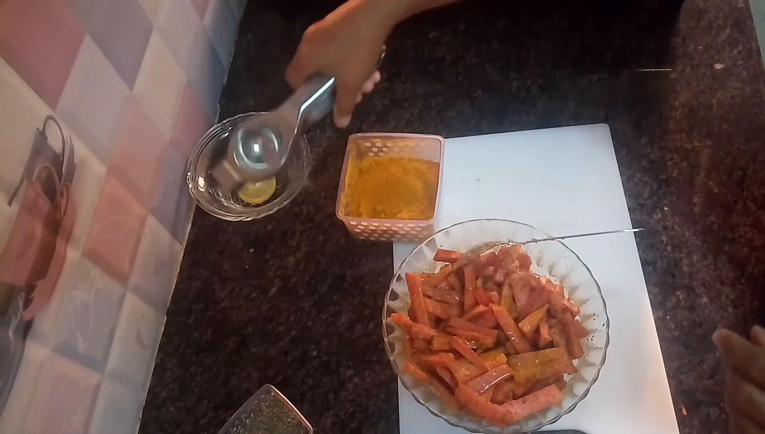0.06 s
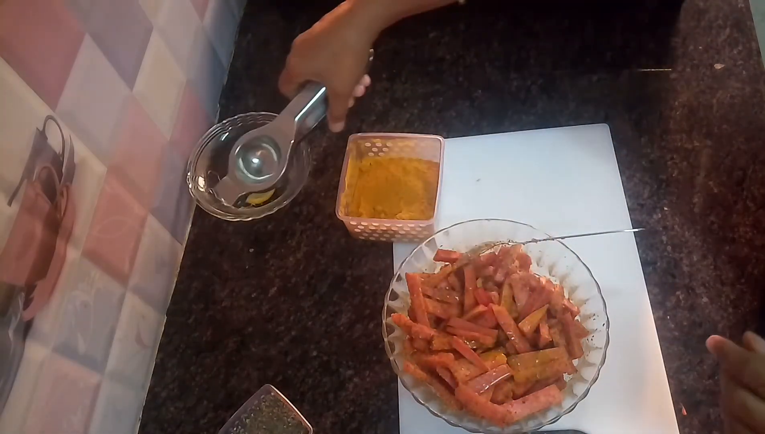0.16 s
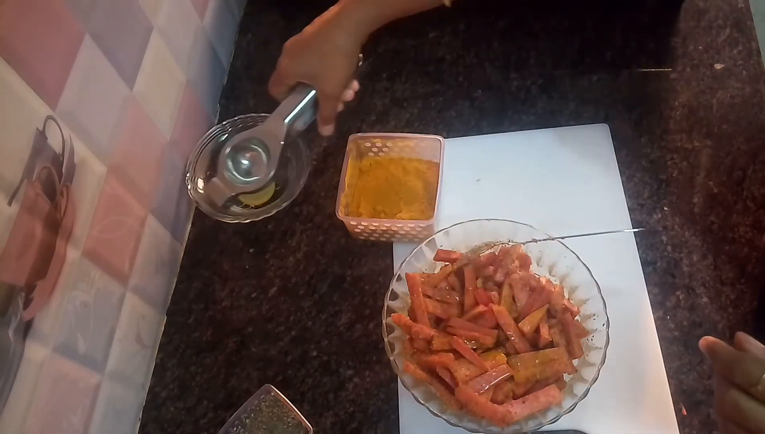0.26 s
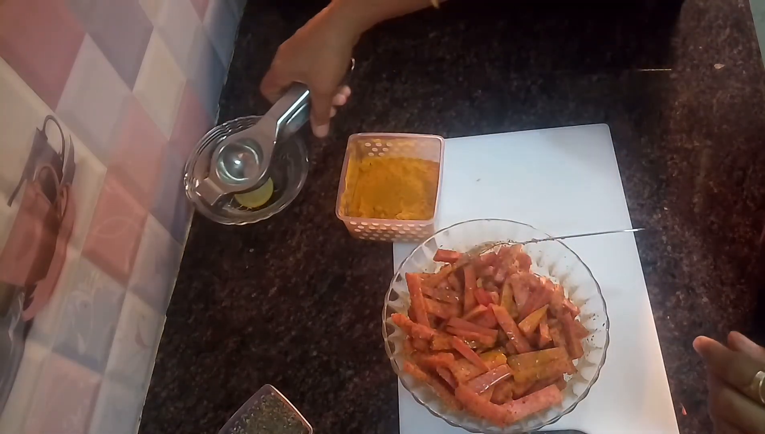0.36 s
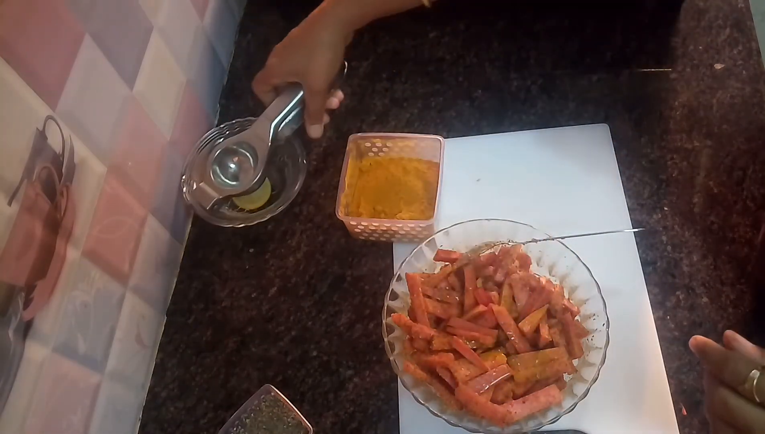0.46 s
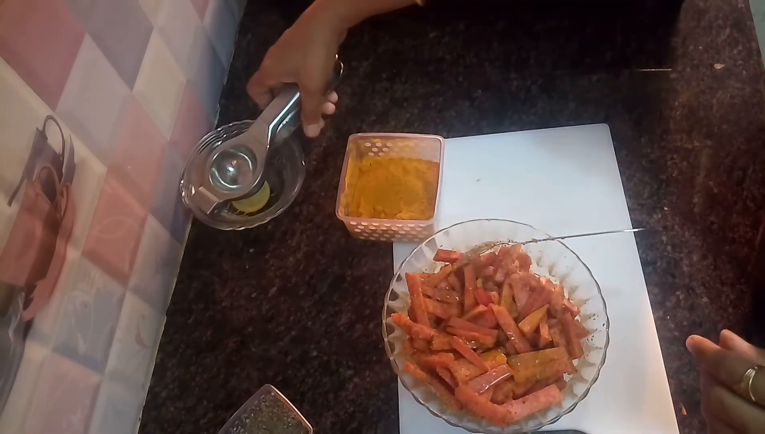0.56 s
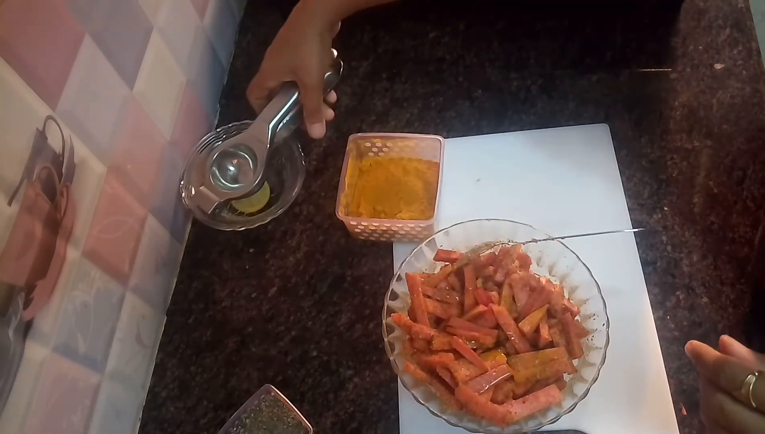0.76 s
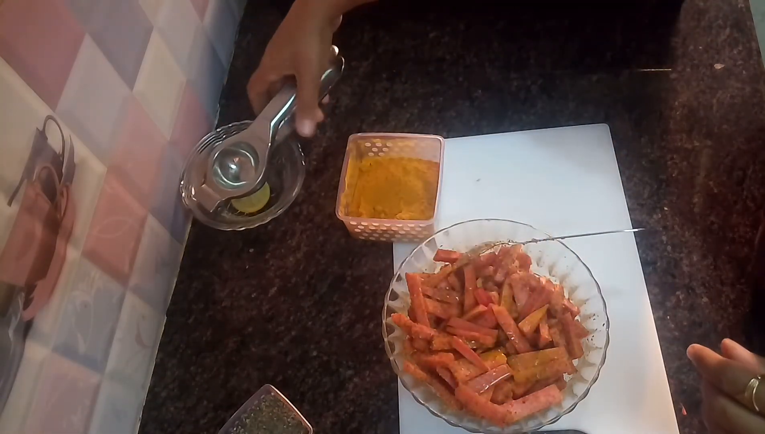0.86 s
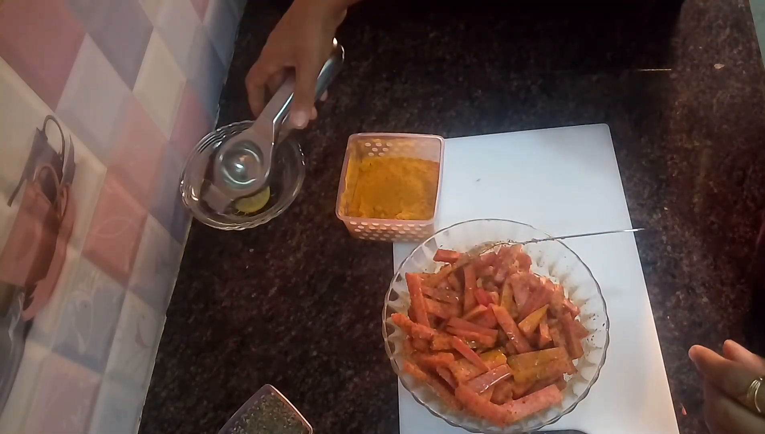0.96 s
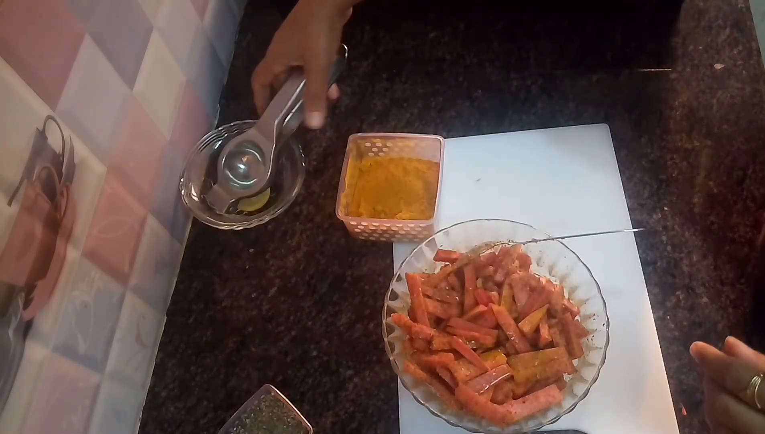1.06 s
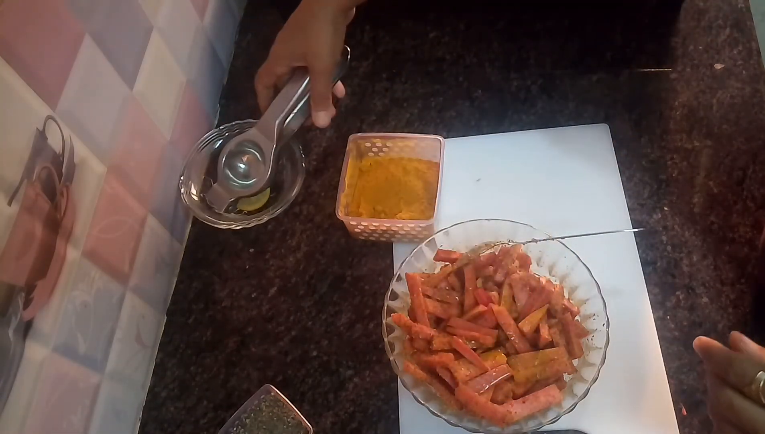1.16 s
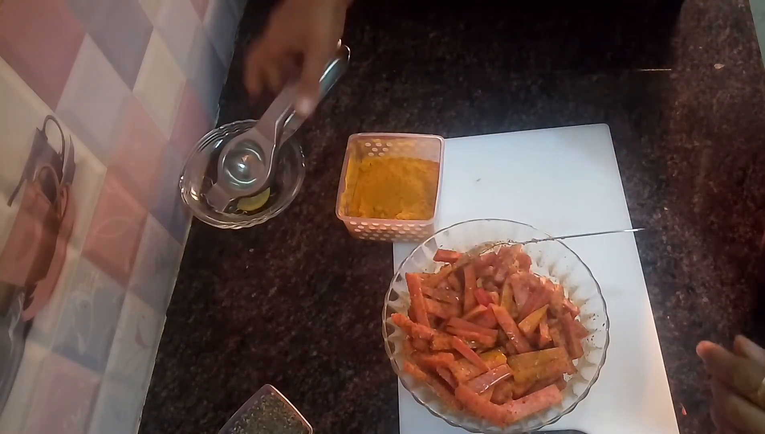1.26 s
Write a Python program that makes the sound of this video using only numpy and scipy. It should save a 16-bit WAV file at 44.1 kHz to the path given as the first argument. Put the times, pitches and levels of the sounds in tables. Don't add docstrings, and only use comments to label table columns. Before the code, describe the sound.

A metal lemon squeezer lands in a small glass bowl with one hard clink and fast rebounds, then rocks with duller clatters and lightly rubs the rim; close stereo microphone in a small tiled kitchen.

```python
import sys
import numpy as np
from scipy import signal
from scipy.fft import rfft, irfft
from scipy.io import wavfile
from scipy.ndimage import uniform_filter1d

SR = 44100
rng = np.random.default_rng(int(sys.argv[2]) if len(sys.argv) > 2 else 0)


def unload_audio(sound):
    columns = np.transpose(np.atleast_2d(sound))
    steps = np.round(np.clip(columns, -1, 1) * 32767)
    wavfile.write(sys.argv[1], SR, steps.astype(np.int16))


def convert_level_to_amplitude(level_db):
    exponent = np.asarray(level_db, float) / 20
    return 10 ** exponent


N = 57330

# freq_hz, density_db (per Hz)
AIR_SPECTRUM = [(25, -34.5), (60, -7), (110, -7), (170, -19.5), (300, -13), (1000, -20), (6000, -29),
                (15000, -43)]
AIR_DB, AIR_FLICKER_DB = -72, 4.5
HUM_HZ, HUM_WIDTH_HZ, HUM_DB, HUM_FLICKER_DB = 136, 82, -71, 4.5

# freq_hz, t60_s, level_db, left_right_likeness (0-1)
KITCHEN_ECHO = [(104.7, 0.23, -13.5, .9), (254, 0.49, 0.5, 0.64), (600, 0.31, -3, 0.6),
                (1218, 0.64, -5.5, 0), (2600, 0.38, -1, 0.1), (4935, 0.41, -8.5, 0), (8830, 0.23, 0.5, 0.7),
                (14290, 0.16, -7, 0)]
ROOM_RISE_S, ROOM_GAP_S = 0.002, 0.0012

# pitch_hz, level_db, t60_s, left_minus_right_db
COUNTER_MODES = [(113.7, -13, 0.44, -1.3), (160, -17.5, 0.17, -2.1), (228.6, -11.5, 0.13, -0.24),
                 (281.9, -11.5, 0.11, 0), (330.5, -1, 0.091, 0.37), (437, -9.5, 0.19, -1),
                 (514, -2.5, 0.0684, -2.5)]
# pitch_hz, level_db, t60_s, left_minus_right_db
BOWL_MODES = [(1776, -13.5, 0.52, -14.5), (1703, -12.5, 0.32, 8.5), (3040, -21, 0.21, -19.5),
              (3167, -28.5, 0.035, -5), (4425, -13.5, .22, 15.5), (4478, -1, 0.11, 1),
              (5220, -9, 0.042, 1.5), (5945, -16, 0.074, 5), (7390, -17.5, 0.29, 3.5), (7920, -28, 0.1, -3),
              (10330, -32, 0.067, -6.5), (10560, -34, .14, -5.5), (14070, -29.5, .08, -11),
              (9290, -19.5, 0.0543, -7)]
# pitch_hz, level_db, t60_s, left_minus_right_db
SQUEEZER_MODES = [(633.3, -10.5, 0.078, 6), (715.4, -10, 0.069, -11), (942.5, -2.5, 0.04, -4),
                  (1008, -3.5, .05, -4), (1083, -4.5, 0.041, 4), (1193.5, 3, 0.028, -7),
                  (1330, -9, 0.16, -3.5), (1445, 0.5, 0.051, 2), (1541, -12.5, 0.039, 14),
                  (1862.6, -3.5, 0.059, 7.5), (2182, -7.5, .04, -12), (2734, -3.5, 0.028, -5.5),
                  (3716, -7.5, 0.034, 5), (5425, -27, .05, 6.5)]
# pitch_hz, level_db, t60_s, left_minus_right_db
HINGE_MODES = [(2400, -12, 0.033, -15.5), (3120, -0.5, 0.045, 2), (4259, 7, 0.0043, -2.5),
               (5100, 1.5, 0.012, -8), (6180, -4, 0.01, 5.5), (7506, -3.5, 0.0083, 13.5),
               (11060, -13, .015, 7.5), (11470, -14, .008, 3.5), (13500, 0.5, .015, -14.5)]
# pitch_hz, level_db, t60_s, left_minus_right_db
RIM_MODES = [(318, -15, 0.091, -3.5), (620, -9, .05, -0.5), (910, -9, .05, -3.5), (1600, -2, 0.045, 2),
             (1732, -5.5, 0.15, -0.5), (2510, -12.5, 0.029, -7), (2930, -6.5, 0.027, 2),
             (3427, -7, 0.02, -7), (4460, -6, 0.067, -0.5), (4588, -3, 0.04, 5.5),
             (7560, -12.5, 0.077, 1.5), (10460, -30, .01, -3.5)]
RIM_BODY_MODES = 6

# start_s, contact_s, bowl_db, squeezer_db, counter_db
CONTACTS = [(0.223, 0.00012, -17, -23.5, -35.5), (0.228, 0.0002, -33, -36, -38),
            (0.2331, 0.0016, -39.5, -24, -32), (0.2409, 0.0017, -33.5, -33.5, -33),
            (.2500, 0.00085, -53.5, -18.5, -38.5), (0.259, 0.0012, -53.5, -22, -31.5),
            (.3958, 0.0012, -60, -35.5, -27.5), (0.3984, 0.0022, -27, -26, -37),
            (0.41, 0.001, -63.5, -29.5, -39.5), (0.4409, 0.0038, -36, -24.5, -39.5),
            (0.45, 0.0021, -18, -21.5, -70), (0.466, 0.0016, -47, -35, -36.5),
            (0.478, .0015, -29, -41, -53.5), (0.489, 0.00068, -66, -25.5, -49),
            (.5500, 0.0014, -33, -22.5, -43.5), (0.5561, 0.0015, -35, -37.5, -44),
            (1.002, 0.0041, -41.5, -53, -61), (1.033, 0.009, -77, -51, -61), (1.065, 0.0062, -75, -55, -57)]
# start_s, contact_s, level_db
HINGE_TICKS = [
    (.2240, 0.00029, -13),
    (.2302, 0.0018, -21.5),
    (.397, 0.0036, -39.5),
    (.449, 0.012, -40),
    (.5445, 0.0029, -28),
    (.5487, 0.001, -39),
]
# time_s, body_db, bright_db
RUB_LEVELS = [
    (.92, -87, -87.5),
    (0.944, -72.5, -76),
    (.985, -61.5, -65.5),
    (0.997, -53, -48),
    (1.025, -53, -57.5),
    (1.049, -56.5, -73),
    (1.098, -72.5, -80),
    (1.133, -76.5, -80),
    (1.16, -86, -99),
]

BOWL_SOFT_HZ, SQUEEZER_SOFT_HZ, COUNTER_SOFT_HZ, HINGE_SOFT_HZ = 9700, 2690, 601, 8300
SCATTER_DB = 3.5
PITCH_SCATTER = 0.019
RESTS_FROM_S, RESTING_T60_SHARE, RESTING_PITCH = 0.3, 0.22, 1.012
SLIPS_PER_S = 3000
SOURCE_DB = -5

# freq_hz, level_db
RADIATION_COLOUR = [(25, -11), (95, 0.5), (7500, -0.5), (9200, -25), (10300, 6), (11900, -22.5), (13400, -10),
                    (15500, -33.5)]
LEFT_LAG_S = -0.0002142
TOP_HZ = 15600


def unit(x):
    return x / np.sqrt(np.mean(x ** 2))


def bell(x, hz, width_oct):
    f = np.fft.rfftfreq(x.shape[-1], 1 / SR) + 1
    weight = np.exp(-(np.log2(f / hz) / width_oct) ** 2)
    return irfft(rfft(x) * weight, x.shape[-1])


def walk(rate_hz):
    hold = int(SR / rate_hz)
    steps = np.repeat(rng.standard_normal(N // hold + 1), hold)
    slewed = uniform_filter1d(uniform_filter1d(steps, hold), hold)
    return 0.85 * slewed[:N]


def pair(likeness, size):
    c = np.clip(likeness, 0, 1)
    mid, side = rng.standard_normal((2, size))
    return np.sqrt((1 + c) / 2) * mid + np.sqrt((1 - c) / 2) * side * np.array([[1], [-1]])


def at_hz(hz, table, column):
    return np.interp(np.log(hz), np.log(table[:, 0]), table[:, column])


def air():
    spectrum, tone = np.array(AIR_SPECTRUM), 0
    for hz in 30 * 2 ** np.arange(0, 9.1, 0.5):
        level_db = at_hz(hz, spectrum, 1) + AIR_FLICKER_DB * walk(4.3) * min(1, 500 / hz)
        tone = tone + convert_level_to_amplitude(level_db) * bell(pair(1 - hz / 1500, N), hz, 0.9)
    hum = unit(bell(pair(0.97, N), HUM_HZ, HUM_WIDTH_HZ / HUM_HZ))
    hum = hum * convert_level_to_amplitude(HUM_DB + HUM_FLICKER_DB * walk(57))
    return unit(tone) * convert_level_to_amplitude(AIR_DB) + hum


def kitchen(x):
    table, size = np.array(KITCHEN_ECHO), SR
    t = np.maximum(np.arange(size) / SR - ROOM_GAP_S, 0)
    echo = 0
    for hz in 70 * 2 ** np.arange(0, 8, 0.5):
        t60, level_db, likeness = (at_hz(hz, table, column) for column in (1, 2, 3))
        shape = (1 - np.exp(-t / ROOM_RISE_S)) * np.exp(-np.log(1000) * t / t60)
        shape = shape / np.sqrt(np.sum(shape ** 2))
        echo = echo + convert_level_to_amplitude(level_db) * bell(pair(likeness, size), hz, 0.4) * shape
    return signal.fftconvolve(echo, x.mean(0, keepdims=True), axes=1)[:, :N]


def ring(force, modes, gain_db):
    out = 0
    swing = signal.lfilter([1, 0, -1], [1], force)
    for k, ((hz, level_db, t60, pan_db), extra_db) in enumerate(zip(modes, gain_db)):
        turn = 2 * np.pi * hz
        pole = np.exp(1j * turn / SR - np.log(1000) / (t60 * SR))
        right = signal.lfilter([1], [1, -pole], swing) / (2 * np.sin(turn / SR))
        left = right * np.exp(-1j * turn * LEFT_LAG_S)
        ports = np.array([left.real * convert_level_to_amplitude(pan_db / 2), right.real * convert_level_to_amplitude(-pan_db / 2)])
        out = out + (-1) ** k * convert_level_to_amplitude(level_db + extra_db) * ports
    return out


def rub():
    t, levels, rim = np.arange(N) / SR, np.array(RUB_LEVELS), np.array(RIM_MODES)
    chance = rng.random((2, N))
    slips = (chance[0] < SLIPS_PER_S / SR) * (2 * chance[1] - 1) * convert_level_to_amplitude(3.0 * walk(55))
    out = 0
    for column, modes in ((1, rim[:RIM_BODY_MODES]), (2, rim[RIM_BODY_MODES:])):
        force = slips * convert_level_to_amplitude(np.interp(t, levels[:, 0], levels[:, column]))
        out = out + ring(force, modes, np.zeros(len(modes)))
    return out


def resting(modes):
    return np.array(modes) * [RESTING_PITCH, 1, RESTING_T60_SHARE, 1]


def strikes(events, modes, soft_hz, loaded=None, shift=0.0):
    out, size, ring_size = np.zeros((2, N)), SR // 3, SR // 4
    t = np.arange(size) / SR
    soften = signal.butter(2, min(soft_hz, 20000), fs=SR)
    for at, length, level_db in events:
        force = rng.standard_normal(size) * t / length * np.exp(-(t / length) ** 2 / 2)
        force = force / np.sqrt(np.sum(force ** 2))
        chance = rng.standard_normal((2, len(modes)))
        now = np.array(modes if loaded is None or at < RESTS_FROM_S else loaded, float)
        now[:, 0] *= 1 + shift * chance[1]
        share = np.abs(np.exp(-2j * np.pi * now[:, :1] * t[:2048]) @ force[:2048])
        mix_db = level_db + SCATTER_DB * chance[0] - 20 * np.log10(np.maximum(share, 0.3))
        force = signal.lfilter(*soften, force)
        i = int(at * SR)
        out[:, i:i + ring_size] += ring(force[:ring_size], now, mix_db)[:, :N - i]
    return out


def scene():
    c = np.array(CONTACTS)
    dry = strikes(c[:, [0, 1, 2]], BOWL_MODES, BOWL_SOFT_HZ, resting(BOWL_MODES))
    dry = dry + strikes(c[:, [0, 1, 3]], SQUEEZER_MODES, SQUEEZER_SOFT_HZ, shift=PITCH_SCATTER)
    dry = dry + strikes(c[:, [0, 1, 4]], COUNTER_MODES, COUNTER_SOFT_HZ, shift=PITCH_SCATTER)
    dry = dry + strikes(HINGE_TICKS, HINGE_MODES, HINGE_SOFT_HZ, shift=PITCH_SCATTER)
    dry = dry + rub()
    return convert_level_to_amplitude(SOURCE_DB) * (dry + kitchen(dry))


def top_cut(x):
    return signal.sosfilt(signal.butter(12, 15600, fs=SR, output="sos"), x)


def record(dry):
    colour, size = np.array(RADIATION_COLOUR), 4096
    f = np.fft.rfftfreq(size, 1 / SR) + 1
    cepstrum = irfft(np.log(convert_level_to_amplitude(at_hz(f, colour, 1))), size)
    cepstrum[1:size // 2] *= 2
    cepstrum[size // 2 + 1:] = 0
    response = irfft(np.exp(rfft(cepstrum)), size)
    mix = signal.fftconvolve(dry, response[None], axes=1)[:, :N] + air()
    mix = signal.sosfilt(signal.ellip(8, 0.2, 70, TOP_HZ, fs=SR, output="sos"), mix)
    return top_cut(mix)


dry = scene()
out = record(dry)
unload_audio(out)
```